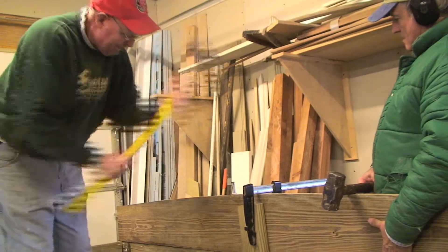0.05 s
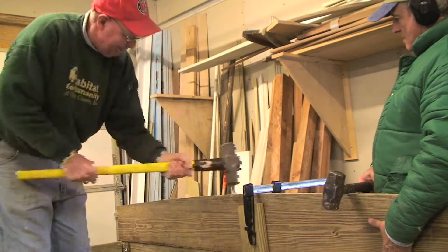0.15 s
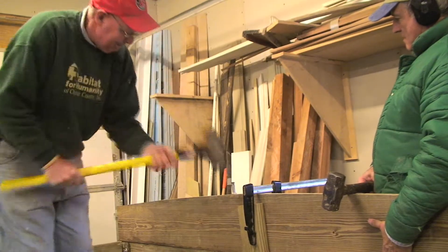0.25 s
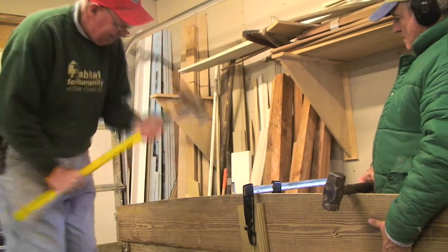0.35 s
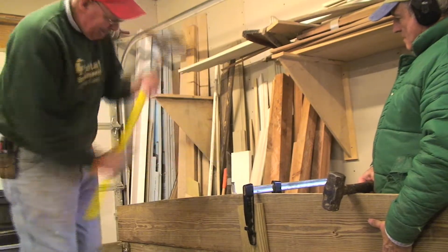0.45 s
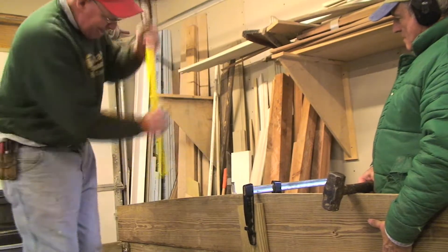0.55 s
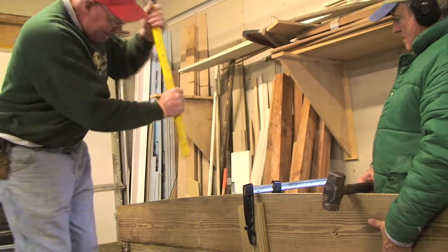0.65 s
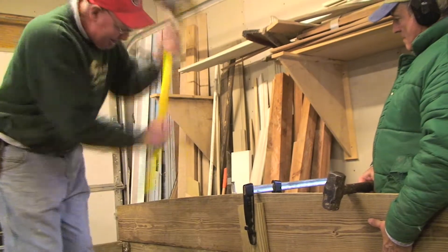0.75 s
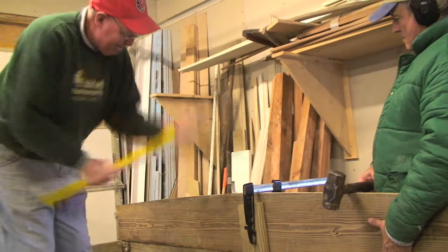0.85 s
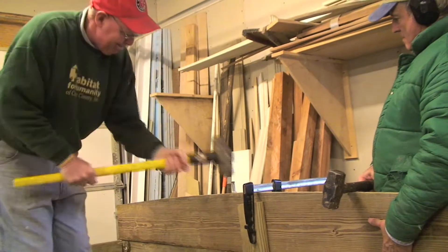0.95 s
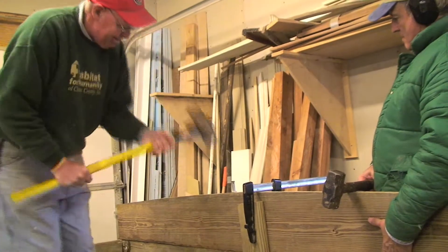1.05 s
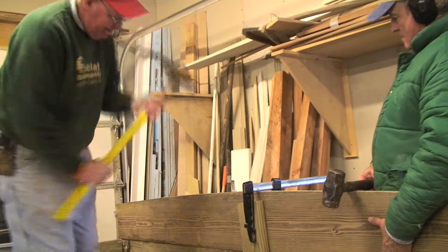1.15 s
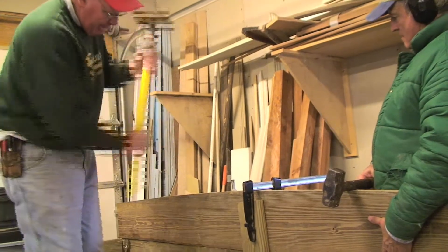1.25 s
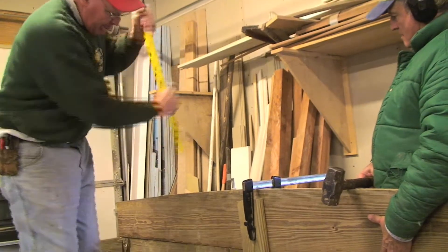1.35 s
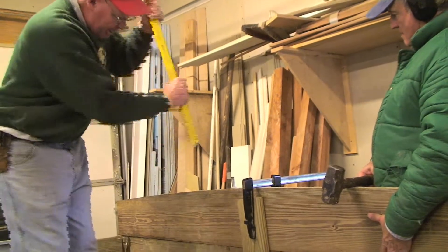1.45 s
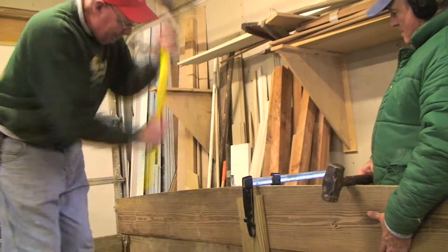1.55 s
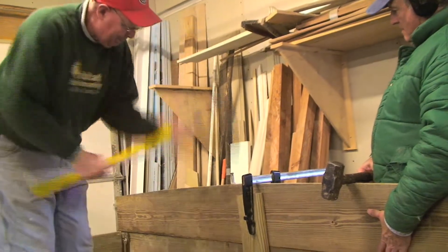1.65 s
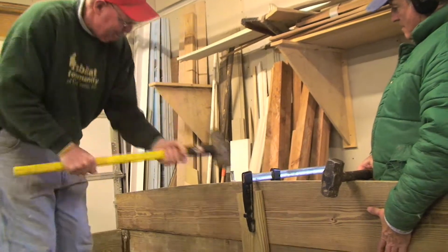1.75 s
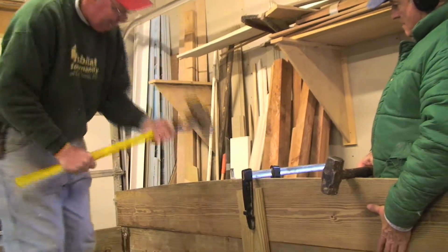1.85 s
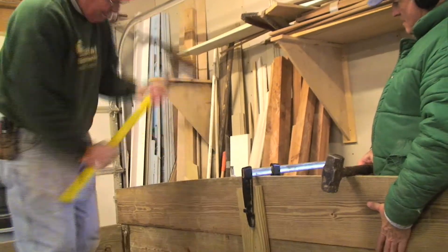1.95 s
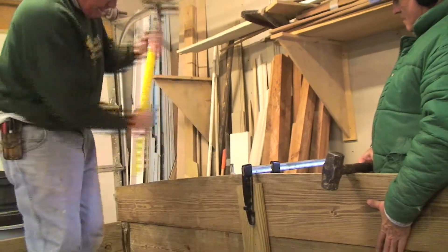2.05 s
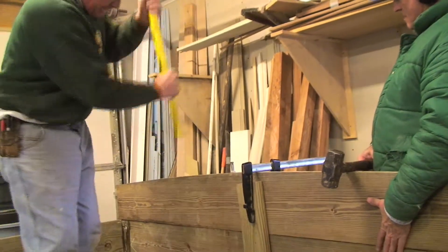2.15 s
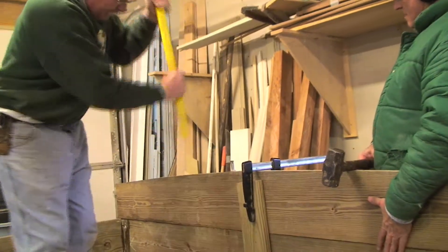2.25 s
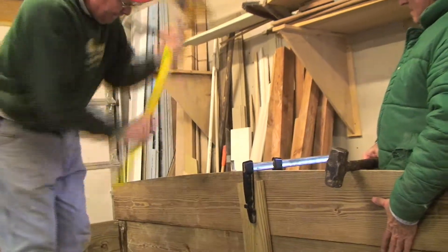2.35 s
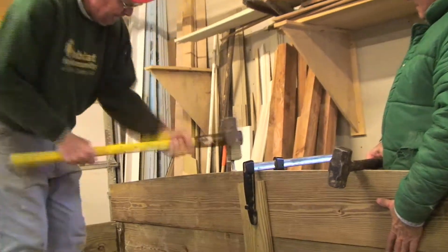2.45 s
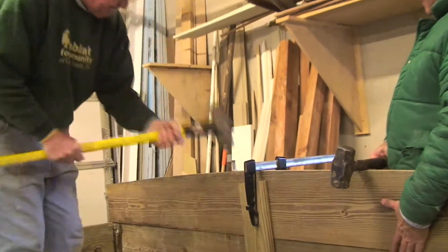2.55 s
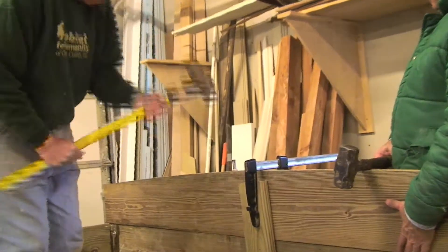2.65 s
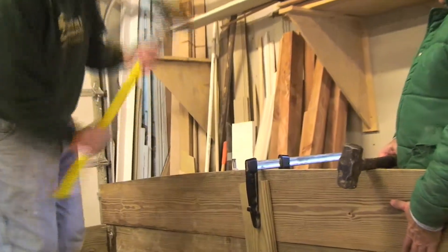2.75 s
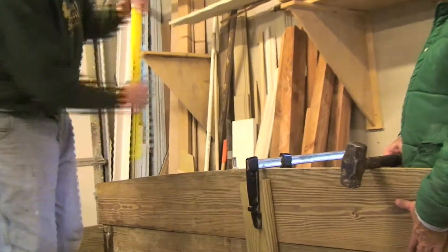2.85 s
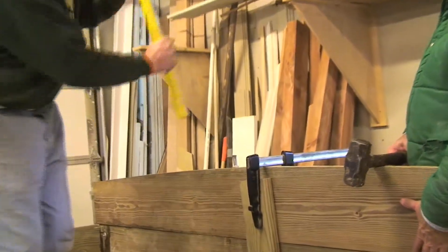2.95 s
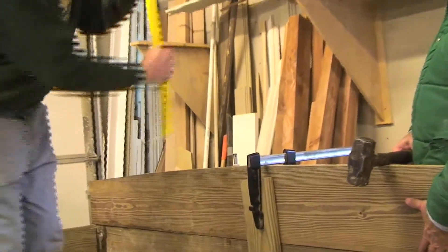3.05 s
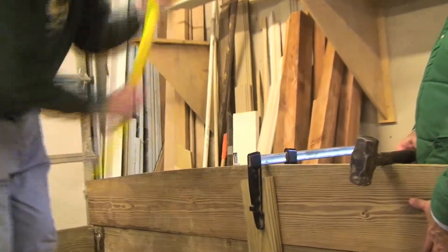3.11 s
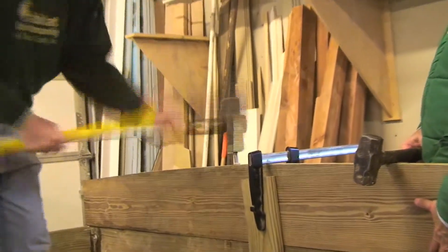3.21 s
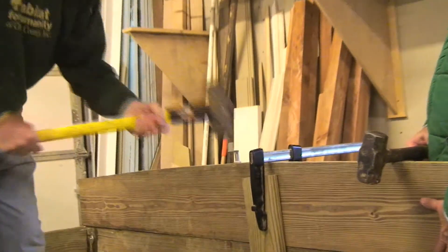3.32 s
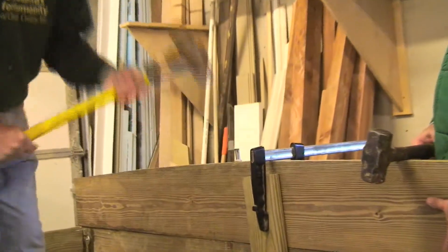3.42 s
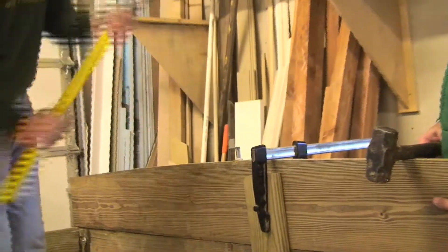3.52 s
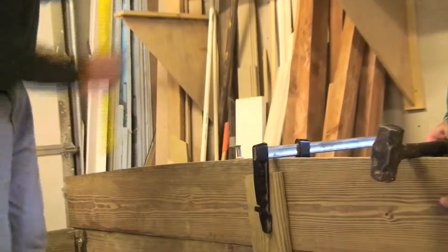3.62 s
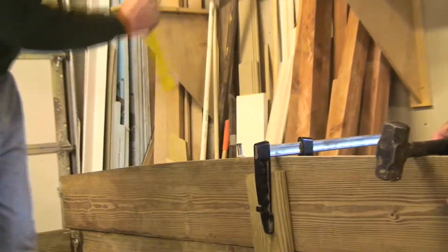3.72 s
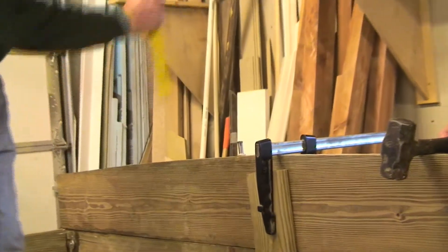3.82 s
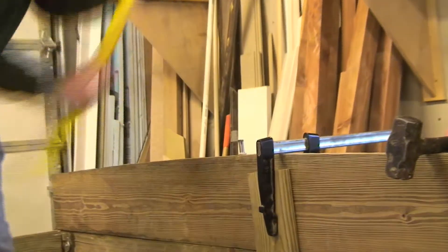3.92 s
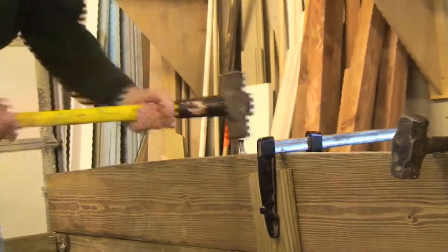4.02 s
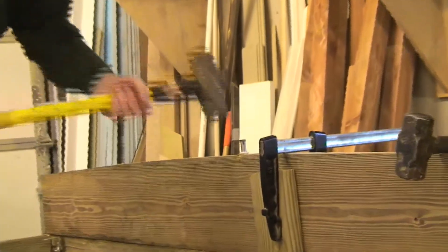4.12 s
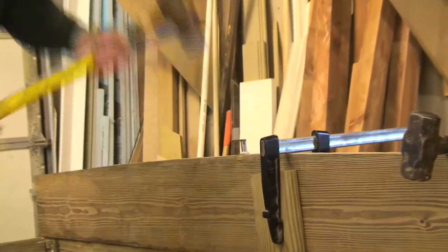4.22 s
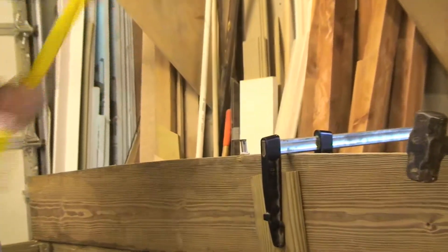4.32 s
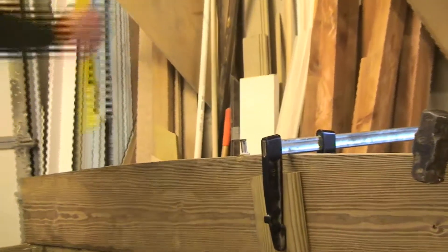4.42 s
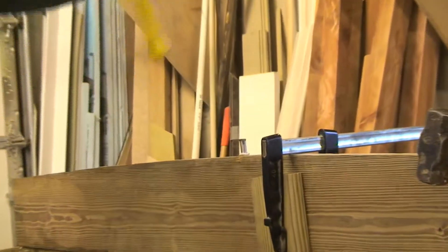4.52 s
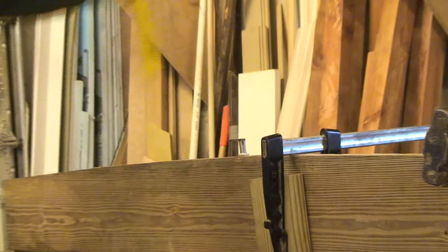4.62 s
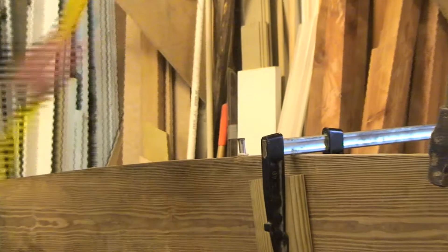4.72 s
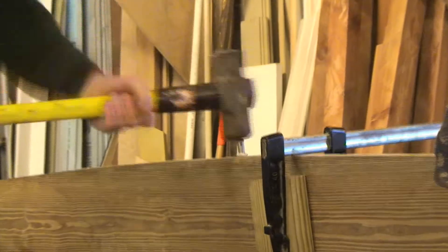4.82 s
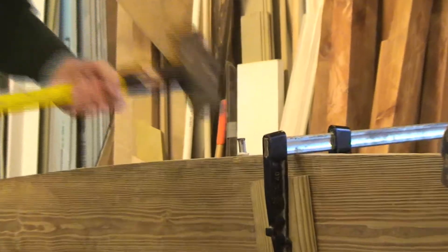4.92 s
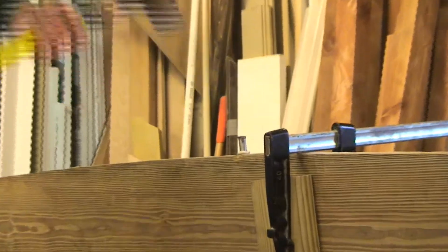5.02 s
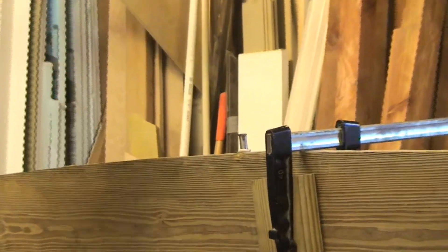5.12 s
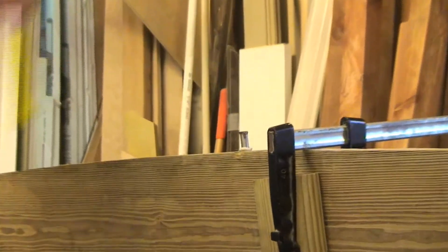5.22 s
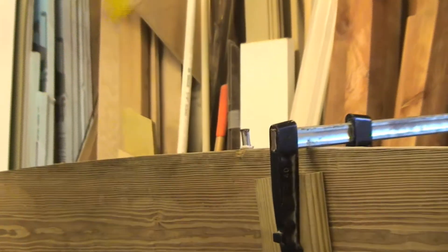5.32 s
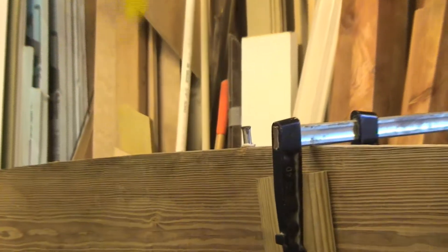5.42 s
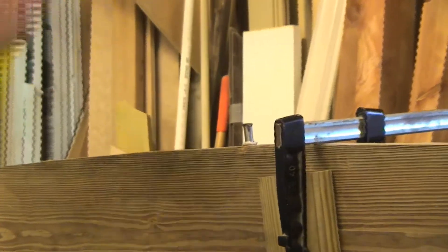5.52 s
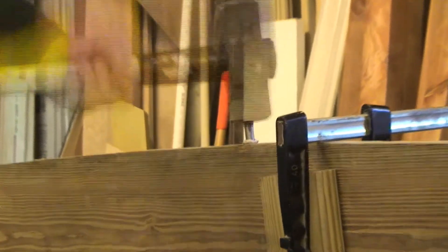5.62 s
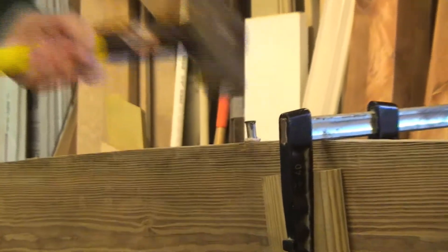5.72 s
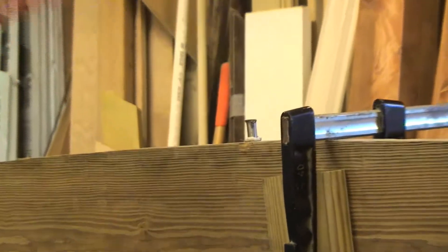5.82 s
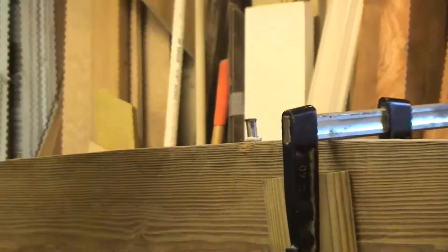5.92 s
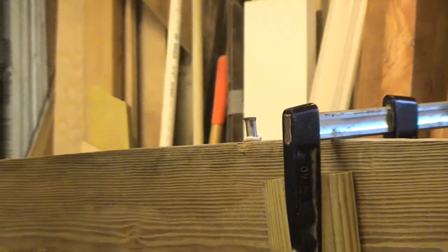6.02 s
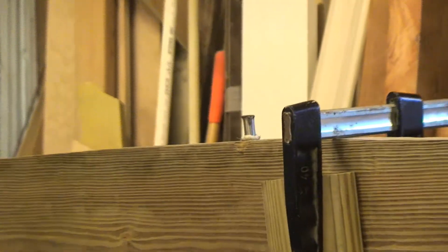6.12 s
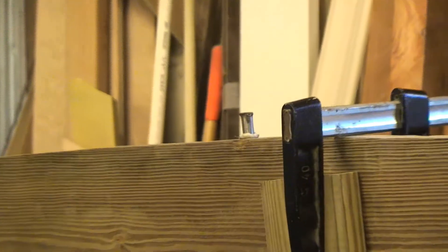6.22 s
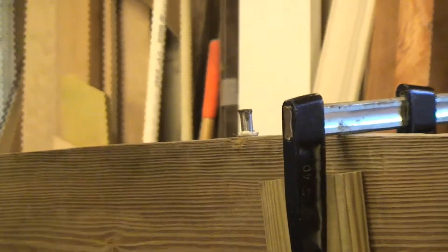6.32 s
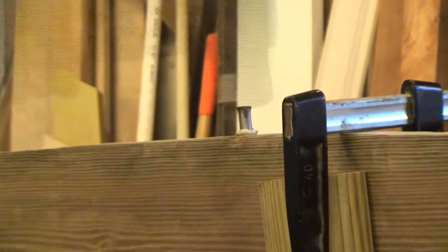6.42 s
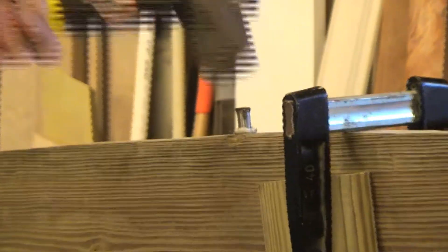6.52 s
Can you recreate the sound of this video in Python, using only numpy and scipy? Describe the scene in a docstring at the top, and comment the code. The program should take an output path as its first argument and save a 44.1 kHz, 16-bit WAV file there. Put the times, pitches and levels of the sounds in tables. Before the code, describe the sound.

A sledgehammer drives a steel bolt into clamped wooden planks with nine loud, evenly paced metallic blows in a quiet workshop.

```python
"""A sledgehammer drives a steel bolt into clamped planks: nine even blows in a quiet workshop.
Each impact shoves the timber, cracks steel on steel and rebounds, overloading the close microphone.
Planks and bolt then ring in their damped modes, reverberation builds, and low standing waves hum on.
Between swings, feet and sleeves stir. As the wood grips the bolt, the later blows
grow a little leaner and harder, since a shorter contact excites more treble."""
import sys
import numpy as np
from scipy import signal
from scipy.fft import rfft, irfft
from scipy.io import wavfile
from scipy.ndimage import uniform_filter1d

SR = 44100
rng = np.random.default_rng(int(sys.argv[2]) if len(sys.argv) > 2 else 0)


def int16_out(signal):
    """Quantize to a 16-bit WAV file."""
    q = np.round(np.clip(np.atleast_2d(signal).T, -1, 1) * 32767)
    wavfile.write(sys.argv[1], SR, q.astype(np.int16))


N = 289296
T = np.arange(SR) / SR  # one second, the life of a blow


# hammer blows: (time [s], gain of the bolt's ringing band [dB])
BLOWS = [(0.1345, -5.5), (0.9067, 1.5), (1.6994, 0.5), (2.4744, -2), (3.2485, -3), (4.0289, 1),
         (4.8327, -0.5), (5.6451, -0.5), (6.4579, 0)]
def hammer(fresh_share=0.23, knock_hz=(1000, 1800), bolt_hz=(2000, 3000), treble_hz=3500):
    """Impulse response: bolt and microphone stay put, so most of it repeats from blow to blow."""
    out = np.zeros(N)
    repeated = clatter() + reverberation()
    phases = rng.uniform(0, 2 * np.pi, len(ROOM_MODES))
    for count, (s, bolt_db) in enumerate(BLOWS):
        strength_db, knock_db, hardness_db = seating(count)
        fresh = clatter() + reverberation()
        body = np.sqrt(1 - fresh_share) * repeated + np.sqrt(fresh_share) * fresh  # powers add
        blow = shove() + crack() + body + standing_waves(phases) + shimmer()
        # the grip of the wood on the bolt changes as it sinks
        blow = boost(blow, knock_db, knock_hz, "band")
        blow = boost(blow, bolt_db, bolt_hz, "band")
        blow = boost(blow, hardness_db, treble_hz, "high")
        add(out, s, undb(strength_db) * blow)
    return out


def seating(count, settling_blows=3.5):
    """Contact time: each blow takes up more of the bolt's play, and a shorter contact is brighter."""
    play = np.exp(-(count / settling_blows) ** 2)
    loose = np.array([2, -1.1, -2.5])  # strength, knock of the plank, hardness [dB]
    seated = np.array([0.1, 0.5, 0.8])
    return seated + play * (loose - seated)


def shove(db=2, hz=1150, t60=0.0048, build_s=0.00058):
    """Damped oscillation: the head drives the plank down, radiating a swing or two of pressure."""
    return undb(db) * swell(build_s) * fade(t60) * np.sin(2 * np.pi * hz * T)


# contacts of hammer and bolt, the strike and its rebounds: (delay [s], level [dB])
CRACK_CONTACTS = [(0, -4.5), (.0066, -13), (0.0125, -10)]
def crack(db=6, hz=5100, t60=0.0028, lag_s=0.00085, snap_db=-3, snap_t60=0.0018, snap_hz=8000):
    """Elastic impact: the steel cracks, then clicks again as the hammer rebounds on the bolt."""
    burst = rng.standard_normal(SR) * fade(snap_t60)
    snap = signal.lfilter(*signal.butter(5, snap_hz, fs=SR), burst)
    ping = fade(t60) * np.sin(2 * np.pi * hz * T)
    impact = ping + undb(snap_db) * snap
    out = np.zeros(SR)
    for delay, contact_db in CRACK_CONTACTS:
        add(out, lag_s + delay, undb(db + contact_db) * impact)
    return out


# modes of planks and bolt: (frequency [Hz], bandwidth [Hz], level above the dense modes [dB])
TIMBER_MODES = [(85, 7.4, 8), (130, 29, 15), (164, 4.8, 17.5), (209.5, 24, 18.5), (231, 9.9, 12),
                (263, 8.2, 12), (276, 25, 12.5), (359, 5.3, 8.5), (419.8, 18, 12.5), (432, 17, 8.5),
                (484, 13, 7.5), (553, 12, 6), (623, 30, 7.5), (647, 11, 4), (742, 51, 7), (814, 9.3, 10.5),
                (828.3, 17, 13), (897, 8.6, 9.5), (905, 36, 6.5), (1095, 41, 11.5), (1166, 24, 9.5),
                (1286, 15, 4.5), (1365, 17, 10), (1566, 58, 8.5), (2560, 5.5, 5.5), (2580, 25, 3.5),
                (3350, 8, 9.5), (4050, 50, 3.5), (4420, 70, 4), (4910, 30, 3)]
def timber_gain():
    """Resonance: each mode adds a Lorentzian peak of power to the planks' frequency response."""
    f = np.fft.rfftfreq(SR, 1 / SR)
    peaks = sum(undb(db) ** 2 / (1 + (2 * (f - hz) / width) ** 2) for hz, width, db in TIMBER_MODES)
    return np.sqrt(1 + peaks)


# spectrum of the dense modes of planks and clamp: (frequency [Hz], level [dB])
CLATTER_SPECTRUM = [(30, -12.5), (75, -19), (150, -16.5), (240, -13.5), (350, -4.5), (800, -4), (1250, -6),
                    (2300, 1), (3100, -5.5), (5000, -5), (5700, -16), (7700, -14), (9000, -26),
                    (15500, -37)]
def clatter(db=31, t60=0.14, build_s=0.00024):
    """Modal overlap: countless damped modes merge into noise, coloured by the main resonances."""
    burst = rng.standard_normal(SR) * swell(build_s) * fade(t60)
    colour = undb(along(CLATTER_SPECTRUM, SR)) * timber_gain()
    return undb(db) * tint(burst, colour, smooth_hz=45)


def shimmer(db=-49, hz=12600, width_hz=300, t60=0.45):
    """Free decay: a narrow, very high band of the steel rings on faintly."""
    band = signal.butter(1, [hz - width_hz / 2, hz + width_hz / 2], "band", fs=SR)
    ring = signal.lfilter(*band, rng.standard_normal(SR))
    return undb(db) * fade(t60) * ring / ring.std()


# spectrum of the reverberation: (frequency [Hz], level [dB])
REVERB_SPECTRUM = [(40, -24), (70, -18), (140, -17.5), (300, -2.5), (480, -3.5), (900, -7.5), (1280, -12.5),
                   (2400, -5.5), (3100, -12.5), (5000, -11.5), (5900, -20), (7600, -21.5), (8600, -31),
                   (15500, -44.5)]
# reverberation time of the workshop: (frequency [Hz], T60 [s])
REVERB_T60 = [(80, .7), (300, 0.55), (900, 0.5), (1500, 0.52), (2400, 0.5), (5000, 0.47), (8000, 0.4),
              (14000, 0.42)]
def reverberation(db=36.0, build_s=0.037, resonance_depth=0.45):
    """Diffuse field: sound builds between the walls, blurs the resonances and loses its treble first."""
    white = rfft(rng.standard_normal(SR))
    centres, t60s = np.transpose(REVERB_T60)
    tail = np.zeros(SR)
    for weights, t60 in zip(np.eye(len(centres)), t60s):
        band = along(np.column_stack([centres, weights]), SR)  # triangle about one centre
        tail += irfft(white * band) * fade(t60)
    colour = undb(along(REVERB_SPECTRUM, SR)) * timber_gain() ** resonance_depth
    return undb(db) * tint(tail * swell(build_s), colour, smooth_hz=70)


# low modes of the workshop: (frequency [Hz], level [dB], build-up [s], T60 [s])
ROOM_MODES = [(94, -35.5, 0.11, 0.81), (127.6, -29, 0.021, 0.36), (165.6, -28, 0.024, .35),
              (221, -14.5, 0.097, 0.32), (287.7, -16, 0.027, 0.58), (265.7, -29, 0.064, 0.93)]
def standing_waves(phases):
    """Room resonance: low standing waves bloom late and hum on after the impact."""
    return sum(undb(db) * swell(build) * fade(t60) * np.sin(2 * np.pi * hz * T + phase)
               for (hz, db, build, t60), phase in zip(ROOM_MODES, phases))


# heel strikes as the weight shifts: (time [s], level [dB])
STEPS = [(0.299, -40), (0.48, -47.5), (1.21, -36), (1.39, -44.5), (2.12, -46), (2.32, -45), (3.89, -48.5),
         (4.54, -49.5), (5.30, -52)]
# spectrum of a footfall: (frequency [Hz], level [dB])
STEP_SPECTRUM = [(25, -17), (42, -4.5), (62, 6.5), (100, -15.5), (300, -14), (600, -25.5), (1500, -51),
                 (6000, -57.5), (15000, -75.5)]
def footfalls(heel_s=0.065, sole_lag_s=0.06, sole_db=-7.5, sole_s=0.1):
    """Soft impact: long contacts give low thuds, first the heel and then the quieter sole."""
    heels = [(s, db, heel_s) for s, db in STEPS]
    soles = [(s + sole_lag_s, db + sole_db, sole_s) for s, db in STEPS]
    return soft_contacts(heels + soles, STEP_SPECTRUM)


# strokes of sleeves and hands: (time [s], level [dB], duration [s])
BRUSHES = [(0.755, -51.5, 0.027), (0.785, -60, .09), (5.56, -56, 0.11), (6.29, -64.5, 0.23)]
# spectrum of a stroke: (frequency [Hz], level [dB])
BRUSH_SPECTRUM = [(100, 1), (450, 3.5), (1000, 3), (2000, -4.5), (3100, -4.5), (3800, 1), (4900, -8),
                  (6000, -8), (7200, -10), (9000, -24), (15000, -39)]
def sleeves():
    """Sliding friction: sleeves and hands brush along the handle with a broadband rustle."""
    return soft_contacts(BRUSHES, BRUSH_SPECTRUM)


def soft_contacts(events, spectrum, peak_share=0.47):
    """Amplitude envelope: each contact is noise that peaks at a share of its duration, then ebbs."""
    out = np.zeros(N)
    for s, db, duration in events:
        age = T / (duration * peak_share)
        add(out, s, undb(db) * age * np.exp(1 - age) * noise(spectrum, SR))
    return out


# spectrum of the workshop's still air: (frequency [Hz], level [dB])
AIR_SPECTRUM = [(25, -4.5), (42, -6.5), (58, 3.5), (90, -9.5), (271, -6), (363, -9), (475, -15), (952, -22),
                (1390, -24.5), (2240, -22.5), (4000, -31), (8300, -38), (15000, -46.5)]
def still_air(db=-60.5):
    """Noise floor: a faint, steady, mostly low sound fills the workshop."""
    return undb(db) * noise(AIR_SPECTRUM, N)


def undb(db):
    """Decibels to amplitude ratio."""
    return 10 ** (np.asarray(db) / 20)


def along(points, n):
    """Log-frequency interpolation of (frequency [Hz], value) points at the bins of n samples."""
    hz, value = np.transpose(points)
    bins_hz = np.maximum(np.fft.rfftfreq(n, 1 / SR), 1)
    return np.interp(np.log(bins_hz), np.log(hz), value)


def add(track, s, sound):
    """Superposition: a sound joins the track at time s."""
    start = max(int(s * SR), 0)
    part = sound[:max(len(track) - start, 0)]
    track[start:start + len(part)] += part


def fade(t60):
    """Exponential decay, 60 dB down after t60 seconds."""
    return np.exp(-np.log(1000) * T / t60)


def swell(seconds):
    """First-order rise from silence to 1 with this time constant."""
    return 1 - np.exp(-T / seconds)


def noise(spectrum, n):
    """Spectral shaping: white noise becomes steady coloured noise of rms 1."""
    coloured = irfft(rfft(rng.standard_normal(n)) * undb(along(spectrum, n)), n)
    return coloured / coloured.std()


def tint(burst, gain, smooth_hz):
    """Minimum-phase filtering: the burst's smoothed spectrum follows gain and its attack stays sharp."""
    spectrum = rfft(burst)
    smoothed = np.sqrt(np.abs(uniform_filter1d(np.abs(spectrum) ** 2, smooth_hz)))
    cepstrum = irfft(np.log(gain / smoothed))
    cepstrum[1:SR // 2] *= 2  # folding onto positive time makes the filter causal
    cepstrum[SR // 2 + 1:] = 0
    return irfft(spectrum * np.exp(rfft(cepstrum)))


def boost(x, db, edges_hz, kind):
    """Parallel filtering: a filtered copy raises or lowers one broad band."""
    band = signal.lfilter(*signal.butter(1, edges_hz, kind, fs=SR), x)
    return x + (undb(db) - 1) * band


def scene():
    """Superposition: still air, blows and body movement sum in one channel."""
    return (still_air() + hammer() + footfalls() + sleeves())[None]


def record(dry, ceiling=0.88, knee=2.3, top_hz=15800):
    """Saturation: the microphone rounds off the loudest peaks; a steep low-pass then cuts the top."""
    rounded = dry / (1 + np.abs(dry / ceiling) ** knee) ** (1 / knee)
    lowpass = signal.ellip(10, 0.2, 70, top_hz, fs=SR, output="sos")
    return signal.sosfilt(lowpass, rounded)


dry = scene()
out = record(dry)
int16_out(out)
```